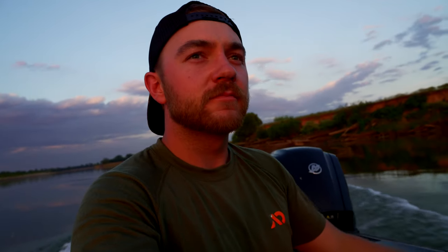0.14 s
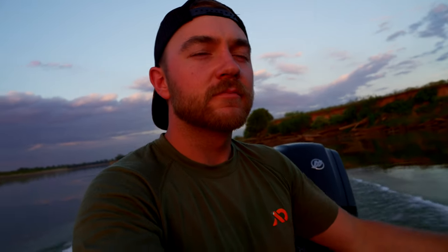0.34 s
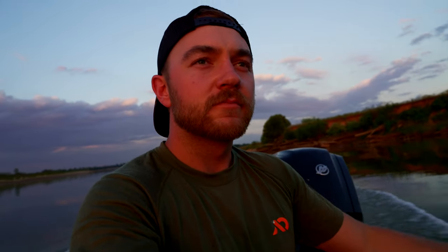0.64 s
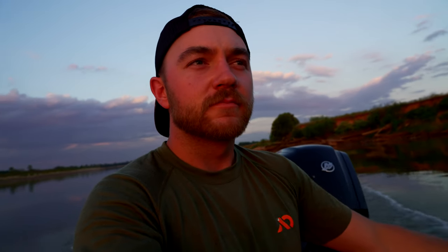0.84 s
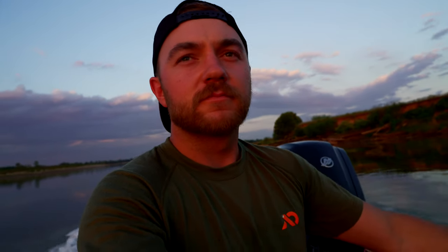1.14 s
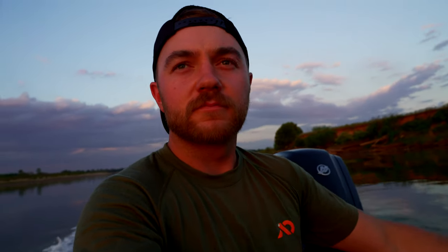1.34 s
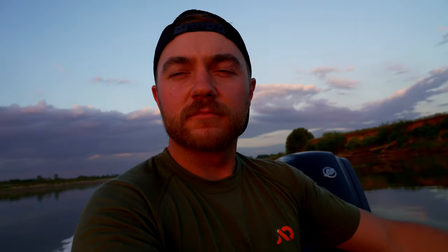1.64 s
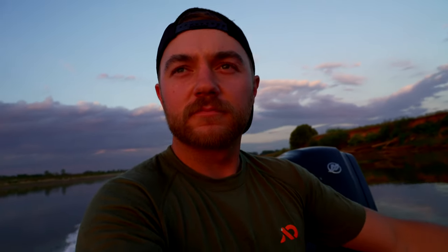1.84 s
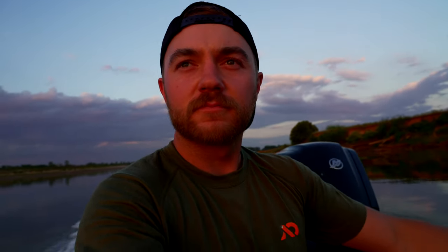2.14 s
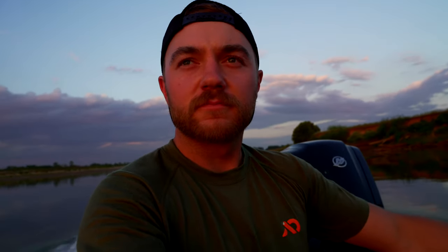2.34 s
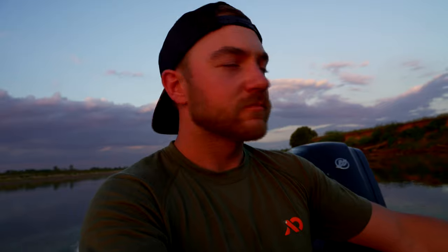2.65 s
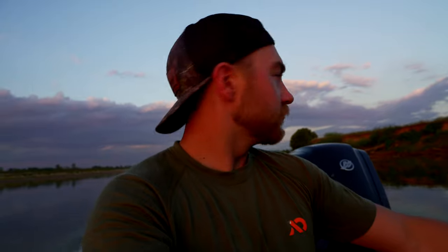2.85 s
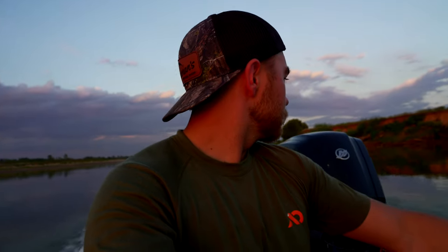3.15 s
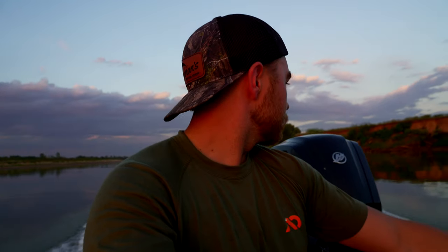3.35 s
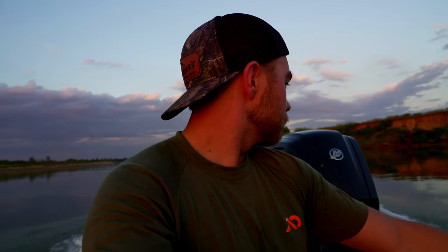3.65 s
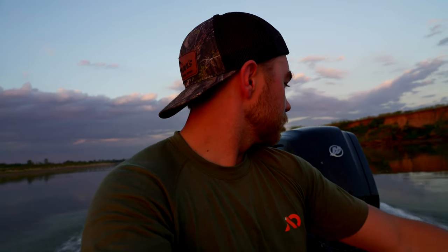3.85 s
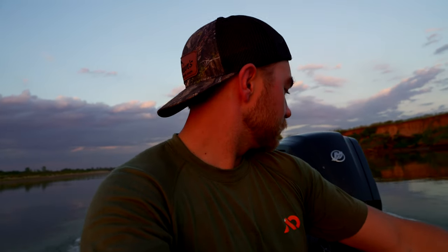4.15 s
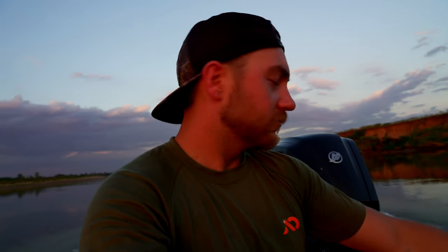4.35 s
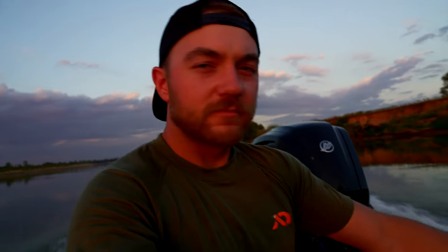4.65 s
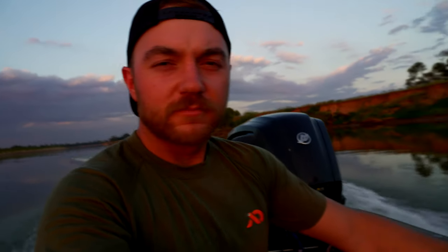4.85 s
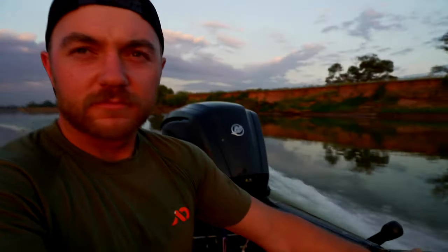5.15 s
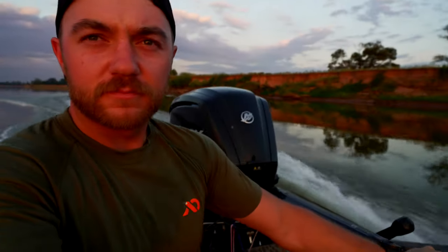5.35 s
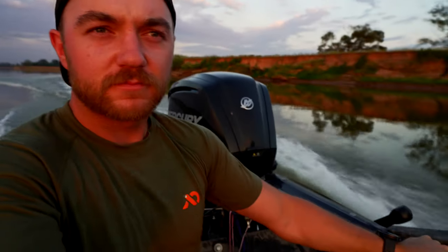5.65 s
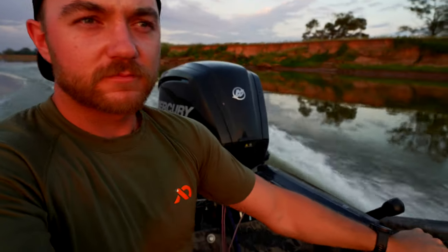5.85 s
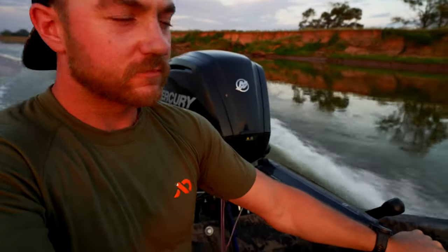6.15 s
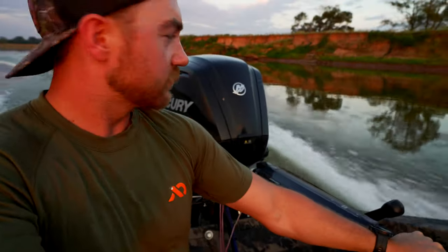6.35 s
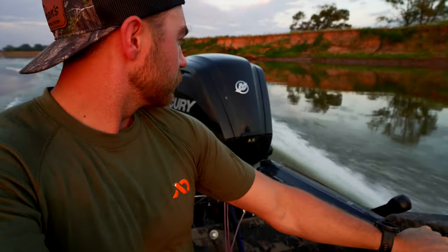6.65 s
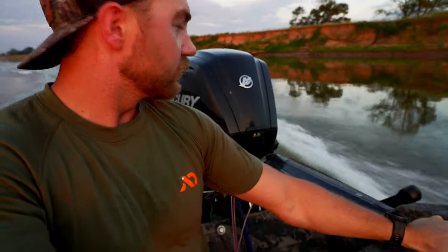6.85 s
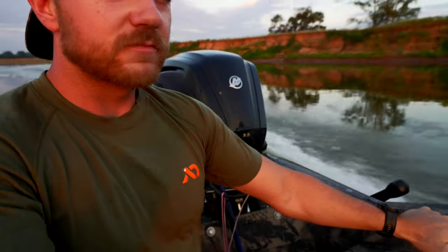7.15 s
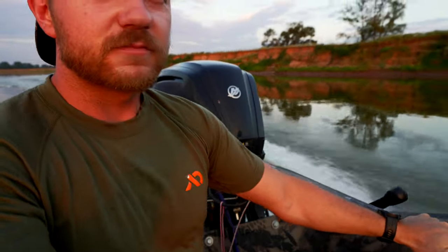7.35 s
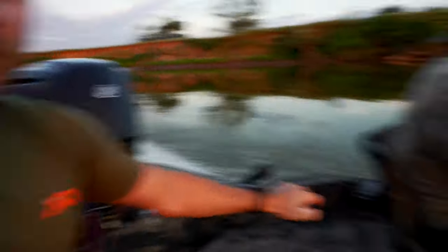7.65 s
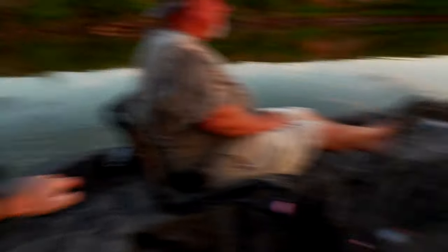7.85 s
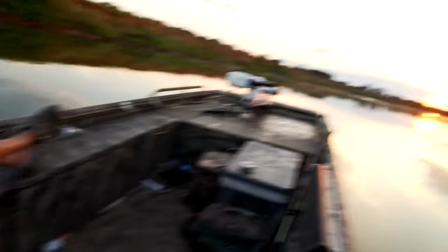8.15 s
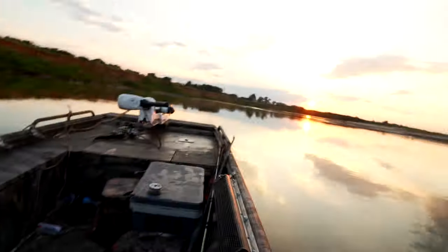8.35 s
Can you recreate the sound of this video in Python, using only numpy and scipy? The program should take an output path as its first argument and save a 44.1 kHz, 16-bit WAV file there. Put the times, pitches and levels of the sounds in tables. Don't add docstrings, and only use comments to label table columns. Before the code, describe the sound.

An outboard boat engine revs up in two surges, then holds a steady booming drone with roar, spray hiss and wind buffeting the microphone.

```python
import sys
import numpy as np
from scipy import signal
from scipy.fft import rfft, irfft, next_fast_len
from scipy.io import wavfile
from scipy.ndimage import uniform_filter1d

SR = 44100
rng = np.random.default_rng(int(sys.argv[2]) if len(sys.argv) > 2 else 0)


def decibels_to_gain(level_db):
    exponent = np.asarray(level_db, float) / 20
    return 10 ** exponent


def generate_wav(signal):
    frames = np.transpose(np.atleast_2d(signal))
    scaled = np.clip(frames, -1, 1) * 32767
    pcm = np.round(scaled).astype(np.int16)
    wavfile.write(sys.argv[1], SR, pcm)


N = 374850

AHEAD_DEG = 68


def unit(x):
    return x / np.sqrt(np.mean(x ** 2) + 1e-20)


def seconds():
    return np.arange(N) / SR


def curves(rows):
    s, *cols = np.transpose(rows)
    return [np.interp(seconds(), s, c) for c in cols]


def wobble(rate):
    knots = rng.standard_normal(int(N * rate / SR) + 4)
    return np.interp(np.arange(N) * rate / SR, np.arange(len(knots)), knots)


def bump(x, centre, width):
    return np.exp(-((x - centre) / width) ** 2)


def swell_db(rows):
    return sum(db * bump(seconds(), s, half) for s, half, db in rows)


def filtered(x, gain):
    m = next_fast_len(N + 8192)
    return irfft(rfft(x, m) * gain(np.fft.rfftfreq(m, 1 / SR)), m)[..., :N]


def colour(points):
    f, v = np.transpose(points)
    return lambda hz: decibels_to_gain(np.interp(np.log(hz + 1), np.log(f), v))


def rush(gain, patchy_db):
    z = signal.stft(rng.standard_normal(N + 512), nperseg=512)[2]
    field = uniform_filter1d(rng.standard_normal(z.shape), size=8, axis=0)
    field = uniform_filter1d(field, size=8, axis=1)
    x = signal.istft(z * decibels_to_gain(patchy_db * unit(field)), nperseg=512)[1][:N]
    return unit(filtered(x, gain))


def camera():
    # start in seconds, view (0 speeding up, 1 shielded, 2 exposed).
    views = [(0, 1.1), (.5, 0), (.9, 1.2), (2.5, 0.88), (3.5, 1.5), (4, 1.74), (4.4, 1.74), (4.55, 2.08),
             (5, 2), (8.5, 2)]
    # time in seconds, heading in degrees.
    swing = [(7.5, 0.5), (7.8, 14), (7.93, 35), (8.05, 64), (8.19, 88), (8.33, 122.5), (8.43, 133),
             (8.5, 115)]
    view, heading = curves(views)[0], curves(swing)[0]
    ahead = 1 / (1 + np.exp((AHEAD_DEG - heading) / 4))
    shadow = bump(heading, 53, 27.5)
    return view + ahead, np.clip(view - 1, 0, 1), heading, shadow, ahead


def throttle():
    # time in seconds, firing rate in Hz.
    speed = [(0.02, 146.0), (0.2, 160.1), (0.3, 164.5), (0.4, 166.1), (0.6, 165.5), (0.8, 160.9),
             (0.9, 161.7), (1.1, 170.8), (1.2, 173.5), (1.5, 177.9), (2.5, 176.8), (3, 175.5), (4, 175.5),
             (4.5, 176.2), (5, 175.5), (6.5, 175.8), (7, 174.9), (8.5, 175.4)]
    return curves(speed)[0]


def crank():
    firing_hz = throttle() + 0.382 * wobble(6)
    return np.cumsum(firing_hz) * np.pi / (2 * SR)


def order(angle, multiple, flutter, start):
    a = multiple * angle + start
    return np.sqrt(2) * ((1 + flutter * wobble(22)) * np.cos(a) + flutter * wobble(22) * np.sin(a))


def firing_note(angle):
    _, seen, heading, _, _ = camera()
    note_db = -14 - 1.1 * seen + 0.32 * wobble(5)
    return decibels_to_gain(note_db) * np.cos(np.radians(heading)) * order(angle, 4, flutter=0.021, start=0)


def hull_octave(angle):
    # centre in seconds, half length in seconds, rise in dB.
    swells = [(0.062, 0.047, 10.5), (.22, 0.035, 5.5), (0.423, .1, 5.5), (.71, 0.043, 5.5), (1.202, .25, 5),
              (1.798, .3, 3), (2.252, 0.29, 6), (2.7, 0.14, 5.5), (3.97, 0.18, 6.5), (4.3, 0.12, 6.5),
              (4.75, 0.44, 6), (5.5, 0.2, 3.5), (6.2, .25, 2), (6.943, 0.032, 4), (7.127, .05, 5),
              (8.334, .15, 4.5)]
    octave_db = -35.5 + 1.27 * wobble(12) + swell_db(swells)
    return decibels_to_gain(octave_db) * order(angle, 8, flutter=0.18, start=0)


def uneven_orders(angle):
    # multiple of the firing rate, level in dB.
    rising = [(0.25, -28), (0.5, -27), (0.75, -23.5), (1, 0), (1.25, -19), (1.5, -46), (1.75, -31.5),
              (2, -22), (2.25, -25.5), (2.5, -32), (2.75, -20), (3, -27), (3.25, -35), (3.5, -24.5),
              (3.75, -33.5), (4, -49), (4.25, -29.5), (4.5, -40), (4.75, -46), (5, -44.5), (5.25, -45),
              (5.5, -42), (5.75, -40.5), (6, -50), (6.25, -48.5), (6.5, -47.5), (6.75, -46), (7, -47.5)]
    shielded = [(0.25, -27.5), (0.5, -21.5), (0.75, -25), (1, 0), (1.25, -22), (1.5, -27), (1.75, -30),
                (2, -18), (2.25, -30.5), (2.5, -31.5), (2.75, -32), (3, -27.5), (3.25, -37), (3.5, -45.5),
                (3.75, -32), (4, -34.5), (4.25, -33), (4.5, -46), (4.75, -41), (5, -40.5), (5.25, -38),
                (5.5, -47.5), (5.75, -54), (6, -44.5), (6.25, -40), (6.5, -47.5), (6.75, -51), (7, -49)]
    exposed = [(0.25, -34.5), (0.5, -23.5), (0.75, -24.5), (1, 0), (1.25, -24.5), (1.5, -25), (1.75, -37),
               (2, -17.5), (2.25, -46), (2.5, -36.5), (2.75, -29), (3, -22), (3.25, -37), (3.5, -40),
               (3.75, -34), (4, -24), (4.25, -26.5), (4.5, -41.5), (4.75, -25), (5, -29), (5.25, -26.5),
               (5.5, -44.5), (5.75, -35), (6, -36.5), (6.25, -39.5), (6.5, -43.5), (6.75, -49.5),
               (7, -39.5)]
    forward = [(0.25, -14), (0.5, -13), (0.75, -13), (1, 0), (1.25, -22), (1.5, -18.5), (1.75, -19.5),
               (2, -12), (2.25, -26), (2.5, -19.5), (2.75, -18.5), (3, -13.5), (3.25, -30), (3.5, -29),
               (3.75, -21), (4, -16.5), (4.25, -25), (4.5, -35), (4.75, -20), (5, -31), (5.25, -31),
               (5.5, -40), (5.75, -44), (6, -31), (6.25, -44), (6.5, -38), (6.75, -40), (7, -30.5)]
    view = camera()[0]
    levels = np.array([np.transpose(t)[1] for t in (rising, shielded, exposed, forward)])
    burst_db = 1.5 * np.interp(angle / (2 * np.pi), np.arange(500), rng.standard_normal(500))
    out = np.zeros(N)
    for k, column in enumerate(levels.T, 1):
        if k == 12:
            start = 0.8
        elif k < 12:
            start = 1.75 if k % 2 else 2.3
        else:
            start = 2.3 * k + 2.35
        start += rng.normal(0, 0.61) * (k > 6)
        if k in (1, 4, 8):
            continue
        tone = order(angle, k, flutter=0.24 if k < 13 else 0.22, start=start)
        if k > 14:
            tone = tone * decibels_to_gain(burst_db)
        out += decibels_to_gain(np.interp(view, np.arange(4), column)) * tone
    return out


def pump_whine(angle):
    # multiple of the engine cycle, level in dB.
    whine = [(32, -45.5), (35, -43.5), (39, -57.5), (41, -56), (46, -44.5), (56, -48), (66, -50.5)]
    out = np.zeros(N)
    for multiple, db in whine:
        out += decibels_to_gain(db + 2.9 * wobble(1.5)) * order(angle, round(multiple), flutter=0.46, start=0)
    t = seconds()
    out += decibels_to_gain(-34.5 - 460 * (t - 0.07) ** 2) * order(angle, 42, flutter=0.22, start=0)
    out += decibels_to_gain(-37 - 80 * (t - 0.45) ** 2) * order(angle, 39, flutter=0.15, start=0)
    return out


def engine(angle):
    orders_db = [-17.5, -15, -13.5, -22]
    view, _, _, shadow, _ = camera()
    level_db = np.interp(view, np.arange(4), orders_db) - 8.5 * shadow
    rest = uneven_orders(angle) + pump_whine(angle)
    return firing_note(angle) + hull_octave(angle) + decibels_to_gain(level_db) * rest


def cowl_roar(angle, surge):
    # frequency in Hz, level in dB per Hz.
    roar = [(40, -120), (70, -16), (150, 0.5), (300, -2.5), (420, -6.5), (600, -8.5), (900, -11),
            (1200, -12.5), (1650, -16), (2100, -18), (2700, -24), (3800, -25), (5000, -35.5), (9000, -120)]
    # centre in seconds, half length in seconds, rise in dB.
    bites = [
        (.52, 0.28, 3),
        (1.148, .2, 2.5),
    ]
    seen, firing_hz = camera()[1], throttle()
    roar_db = -34.5 + 0.15 * (firing_hz - firing_hz[-1]) + 3.5 * seen + swell_db(bites) + 0.3 * surge
    pulse = 1 + 0.029 * np.cos(angle) + 0.04 * np.cos(4 * angle)
    return decibels_to_gain(roar_db) * pulse * rush(colour(roar), patchy_db=0.86)


def spray_and_mist(surge):
    # frequency in Hz, level in dB per Hz.
    spray = [(1500, -120), (2500, 1), (4000, -2.5), (5500, -3), (7000, -6), (9000, -7.5), (11000, -14),
             (14000, -17), (16000, -20)]
    mist = [(6000, -120), (9000, -5), (12000, -2.5), (15000, -2), (16000, -4.5)]
    _, seen, heading, shadow, ahead = camera()
    firing_hz = throttle()
    spray_db = -61 + 0.06 * (firing_hz - firing_hz[-1]) + 3 * seen - 2.5 * shadow
    spray_db += 0.0961 * np.maximum(heading - AHEAD_DEG, 0)
    mist_db = spray_db - 12.5 + 10 * seen * (1 - 0.3 * ahead) - 1.5 * np.tanh(heading / 15)
    lumps_db = 9 + 0.51 * surge + 0.27 * wobble(22)
    coarse = decibels_to_gain(spray_db + lumps_db) * rush(colour(spray), patchy_db=0.6)
    return coarse + decibels_to_gain(mist_db) * rush(colour(mist), patchy_db=0.5)


def wind_buffet():
    # frequency in Hz, level in dB per Hz.
    buffet = [(10, -120), (18, -3.5), (28, -0.5), (45, 4.5), (70, -1.5), (110, -5.5), (200, -9), (400, -21),
              (900, -44.5), (1500, -120)]
    # centre in seconds, peak level in dB.
    gusts = [(.14, -31), (.32, -35), (.7, -35), (1.04, -36), (1.3, -33), (1.48, -26.5), (1.62, -30),
             (1.74, -29), (2.0, -38), (2.21, -34), (2.32, -29), (2.51, -28.5), (2.72, -32), (2.86, -35),
             (3.12, -35), (3.24, -29.5), (3.77, -41), (4.09, -41), (5.4, -37), (6.02, -31), (6.27, -37),
             (6.72, -38.5), (7.05, -37), (7.45, -38), (7.67, -34), (7.8, -34), (8.21, -28), (8.45, -26)]
    breeze = decibels_to_gain(-43 + 6 * camera()[4])
    wind = breeze + sum(decibels_to_gain(db) * bump(seconds(), s, 0.05) for s, db in gusts)
    lumps_db = 0.5 + 0.55 * wobble(9.7) + 1.4 * wobble(22)
    return wind * decibels_to_gain(lumps_db) * rush(colour(buffet), patchy_db=2.0)


def intake_hiss():
    intake = (7800, 350, -67)
    hz, width, db = intake
    faded = (1 + np.tanh(2 * (seconds() - 5.8))) / 2
    hiss_db = db + 3.5 * camera()[1] - 6 * faded + 2.3 * wobble(10)
    return decibels_to_gain(hiss_db) * rush(lambda f: 1 / (1 + (2 * (f - hz) / width) ** 2), patchy_db=2.5)


def cowl_rattle(angle):
    # frequency in Hz, level in dB per Hz.
    rattle = [(500, -120), (620, -8.5), (720, -2.5), (930, 3), (1020, -14), (1300, -120)]
    _, seen, _, shadow, ahead = camera()
    in_sight = seen * (1 - ahead) * (1 - shadow)
    shake = 1 + 0.5 * np.cos(angle + 2.1)
    return decibels_to_gain(-55.5 + 16.3 * in_sight) * shake * rush(colour(rattle), patchy_db=2.5)


def headwind():
    # frequency in Hz, level in dB per Hz.
    wind_colour = [(15, -120), (30, -6), (50, -2), (90, 0.5), (140, -5), (250, -14), (500, -23),
                   (1200, -120)]
    struck = (1 + np.tanh((camera()[2] - 80) / 9)) / 2
    return struck * decibels_to_gain(-26.5 + 2.5 * wobble(25)) * rush(colour(wind_colour), patchy_db=1.5)


def bow_splash():
    # frequency in Hz, level in dB per Hz.
    splash = [(600, -120), (1200, -0.5), (2500, 0), (4200, 2.5), (6000, -9), (10000, -19), (15000, -20.5),
              (16000, -25)]
    _, _, heading, _, ahead = camera()
    splash_db = -42.5 + 0.0461 * (heading - AHEAD_DEG) + 0.87 * wobble(25)
    return ahead * decibels_to_gain(splash_db) * rush(colour(splash), patchy_db=1.2)


def air_and_water(angle):
    surge = wobble(9)
    behind = cowl_roar(angle, surge) + spray_and_mist(surge) + intake_hiss() + cowl_rattle(angle)
    return behind + wind_buffet() + headwind() + bow_splash()


def fitting():
    # start in seconds, peak level in dB, share of the full ring time (0-1).
    ticks = [
        (6.421, -31, 0.5),
        (8.2782, -15.5, .8),
        (8.2825, -21, .8),
        (8.286, -25, 0.9),
        (8.295, -29, 1),
    ]
    # ring frequency in Hz, level in dB, time to fall by 60 dB in seconds.
    modes = [(2200, -10, .02), (2700, -4.5, 0.022), (3400, -0.5, .02), (4230, 2.5, 0.022),
             (4780, -4, 0.012), (5645, -6, .02), (6430, -2, 0.023), (7200, -10, .02)]
    # frequency in Hz, level in dB per Hz.
    crack_colour = [(500, -120), (1500, 3), (2500, 0), (4200, 2), (7000, -1), (8500, -18.5), (15000, -22.5),
                    (16000, -120)]
    out, t = np.zeros(N + SR), np.arange(SR // 10) / SR
    grit = rush(colour(crack_colour), patchy_db=0)
    for s, db, share in ticks:
        first = round(s * SR)
        ring = np.zeros(len(t))
        for hz, mode_db, t60 in modes:
            fall_db = mode_db + rng.normal(0, 1.5) - 60 * t / (t60 * share)
            ring += decibels_to_gain(fall_db) * np.sin(2 * np.pi * hz * t)
        crack = 1.6 * decibels_to_gain(-60 * t / (0.04 * share)) * grit[first:][:len(t)]
        onset = 1 - np.exp(-t / 0.00032)
        out[first:][:len(t)] += decibels_to_gain(db - 9.5) * onset * (ring + crack)
    return out[:N]


def scene():
    angle = crank()
    return (engine(angle) + air_and_water(angle) + fitting())[None]


def low_pass(x):
    return signal.sosfilt(signal.butter(12, 15690, fs=SR, output="sos"), x)


def record(dry):
    ceiling, top_hz = 0.47, 15750
    held = dry / (1 + (dry / ceiling) ** 8) ** (1 / 8)
    kept = filtered(held, lambda hz: hz < top_hz)
    return low_pass(kept)


dry = scene()
out = record(dry)
generate_wav(out)
```